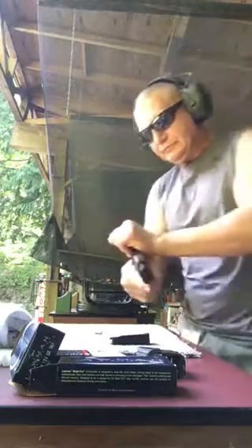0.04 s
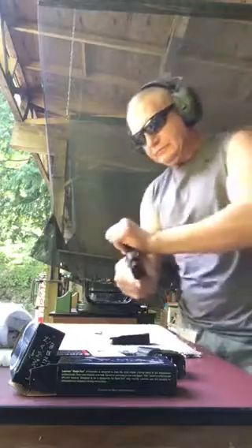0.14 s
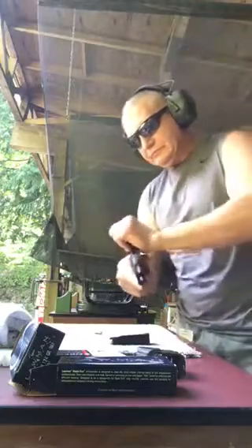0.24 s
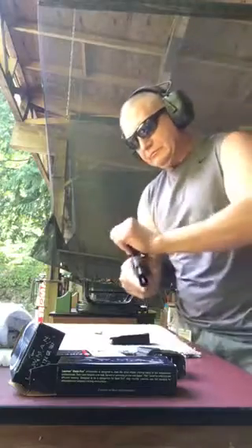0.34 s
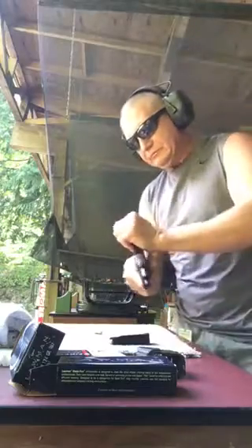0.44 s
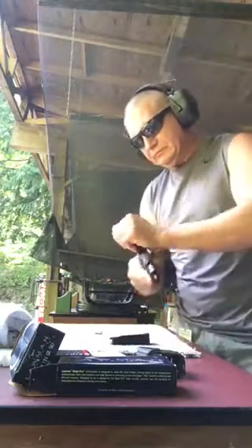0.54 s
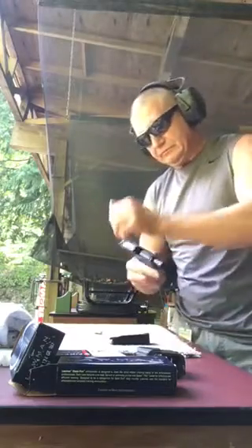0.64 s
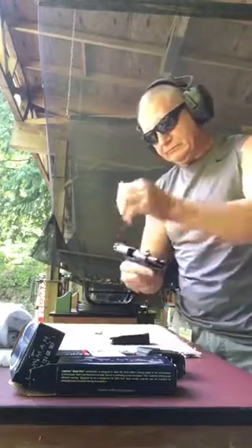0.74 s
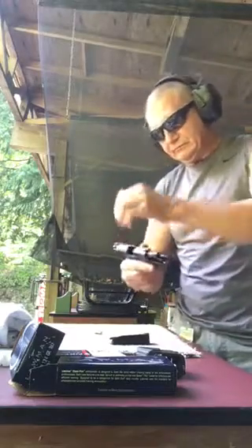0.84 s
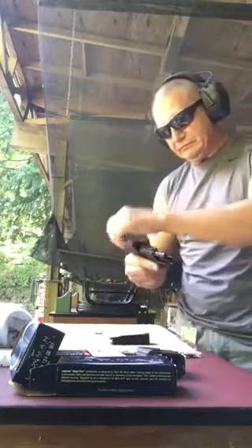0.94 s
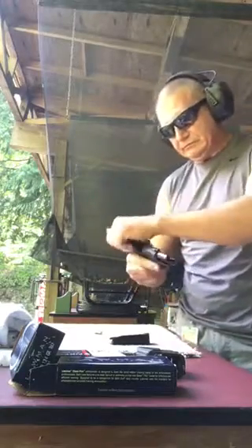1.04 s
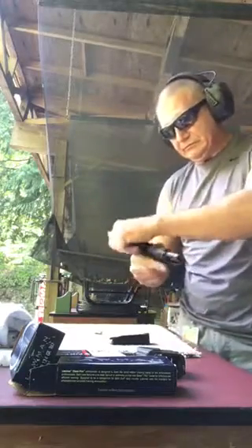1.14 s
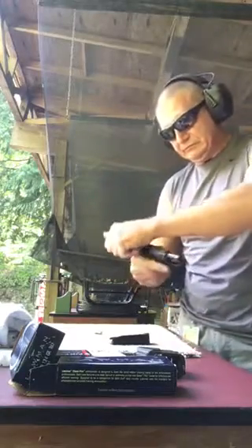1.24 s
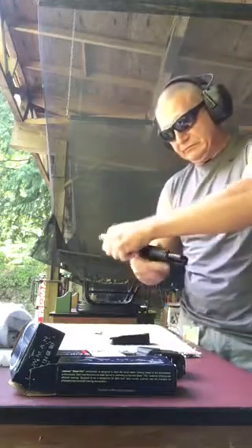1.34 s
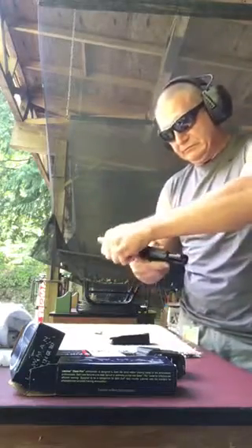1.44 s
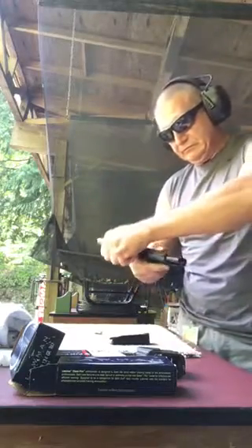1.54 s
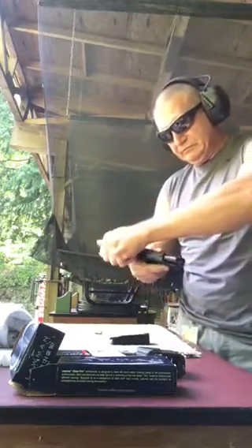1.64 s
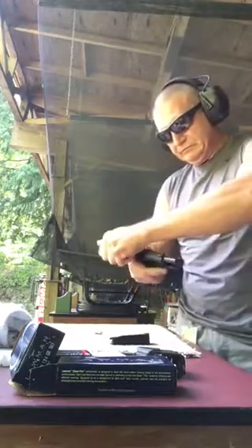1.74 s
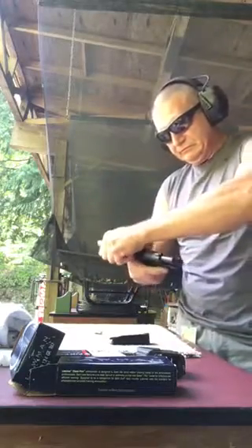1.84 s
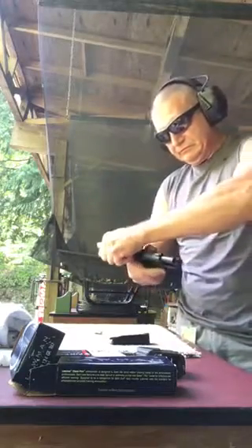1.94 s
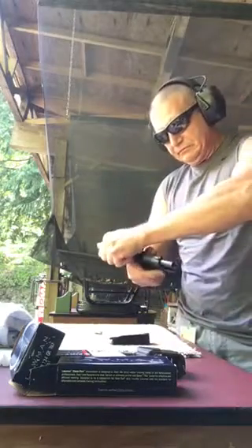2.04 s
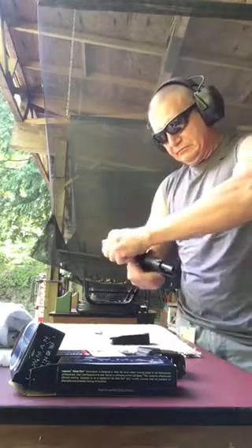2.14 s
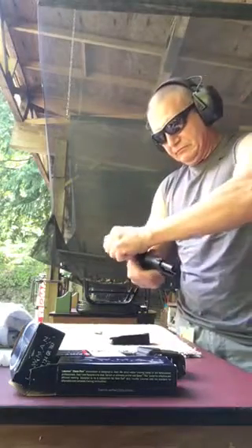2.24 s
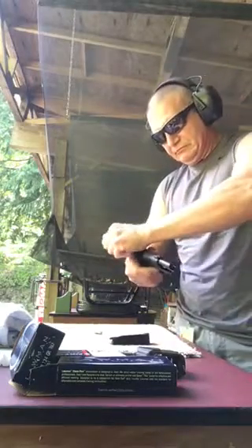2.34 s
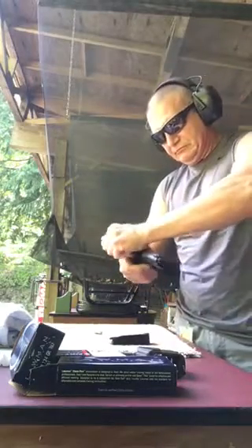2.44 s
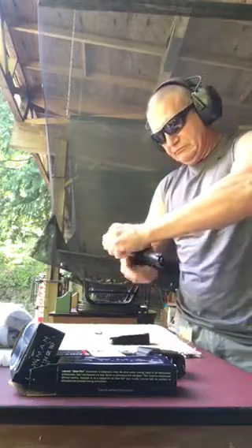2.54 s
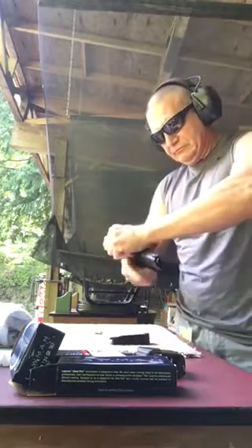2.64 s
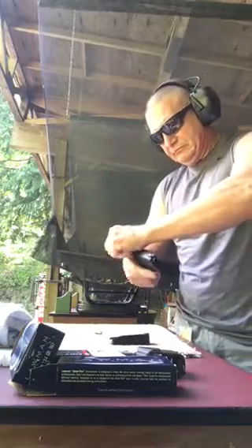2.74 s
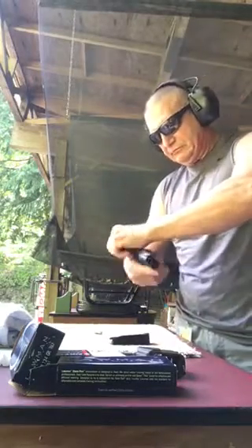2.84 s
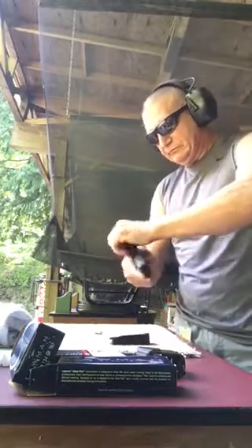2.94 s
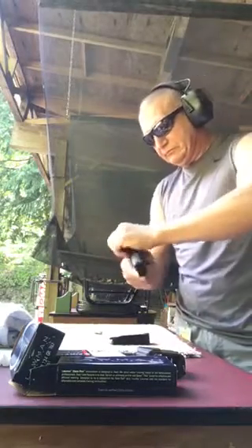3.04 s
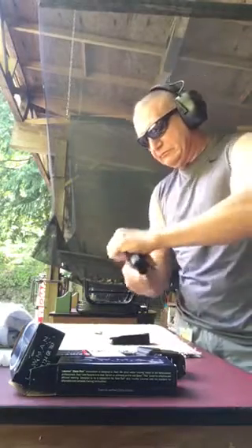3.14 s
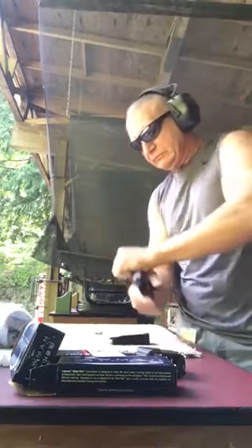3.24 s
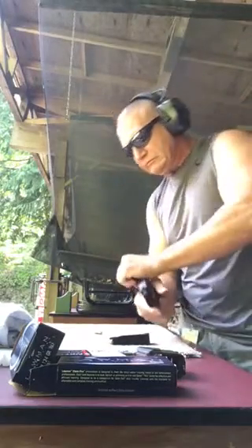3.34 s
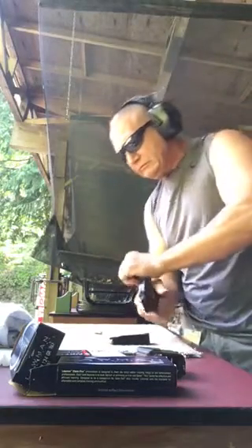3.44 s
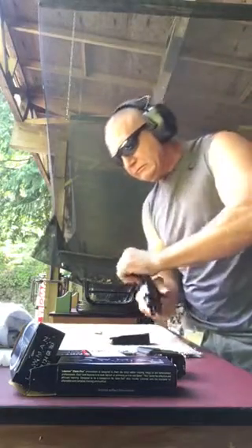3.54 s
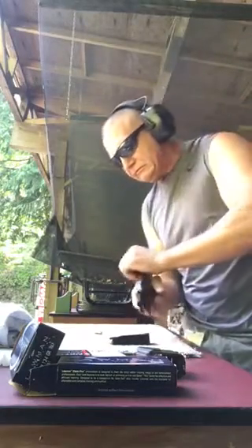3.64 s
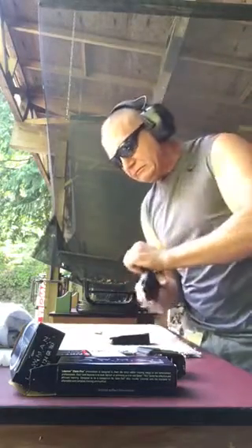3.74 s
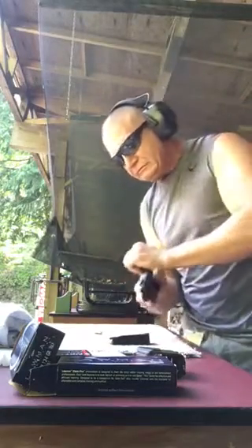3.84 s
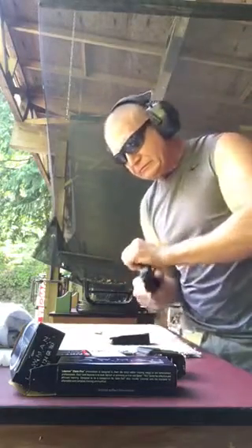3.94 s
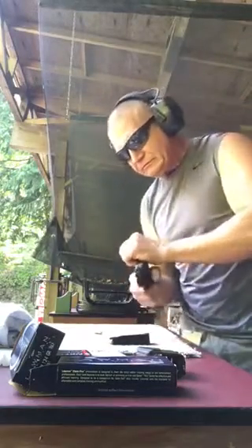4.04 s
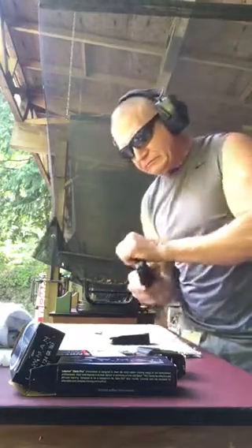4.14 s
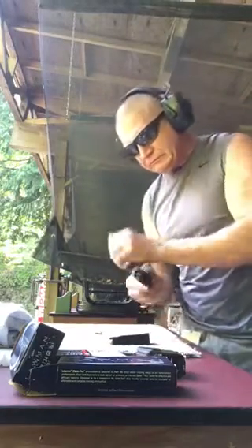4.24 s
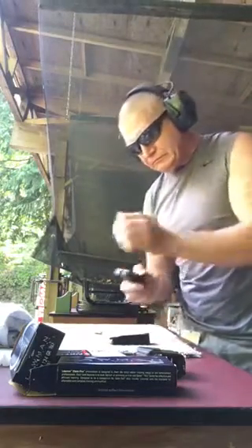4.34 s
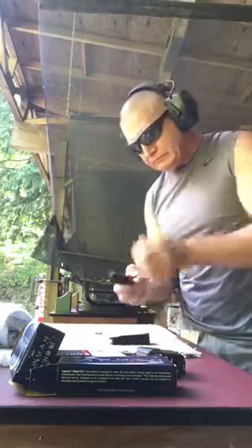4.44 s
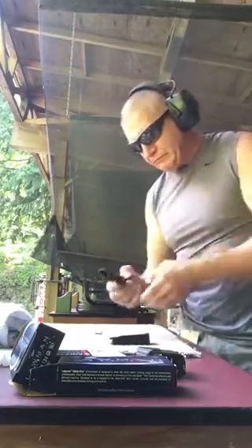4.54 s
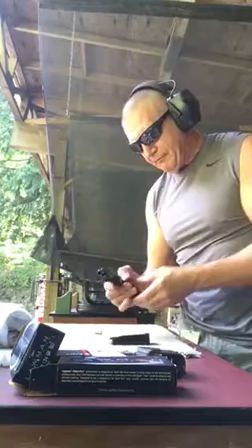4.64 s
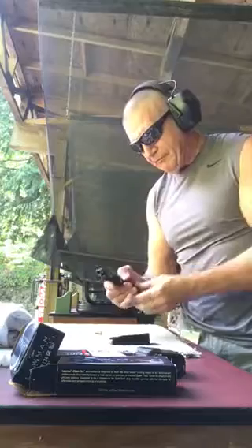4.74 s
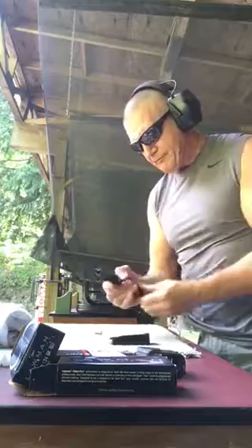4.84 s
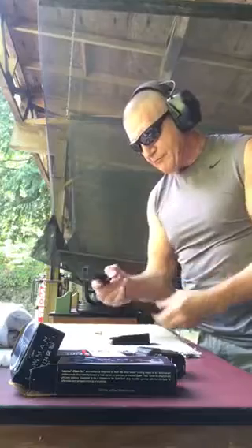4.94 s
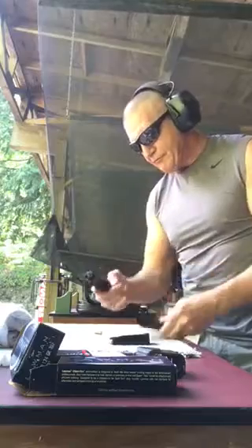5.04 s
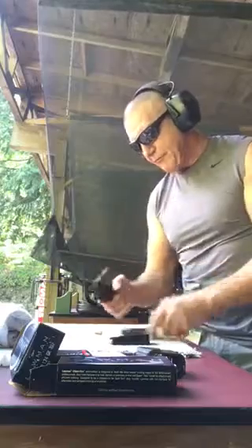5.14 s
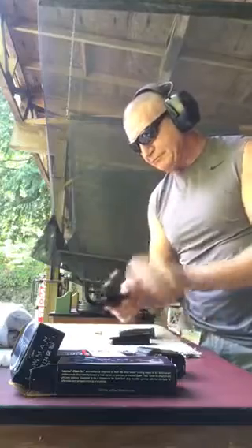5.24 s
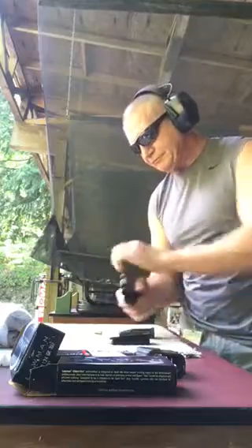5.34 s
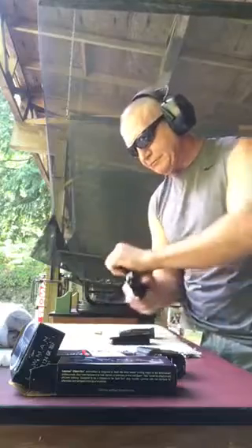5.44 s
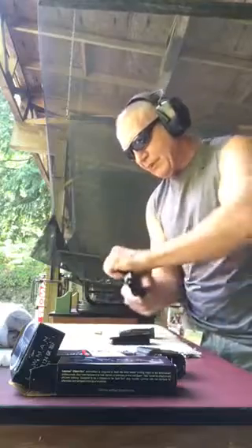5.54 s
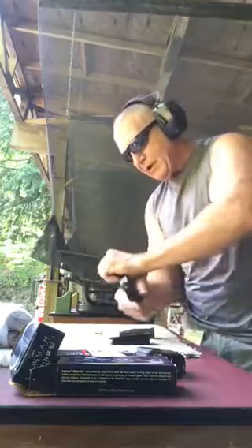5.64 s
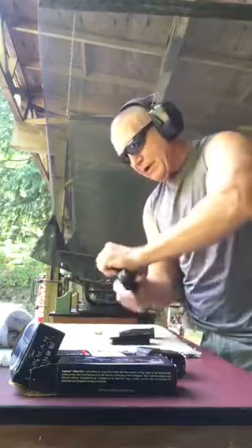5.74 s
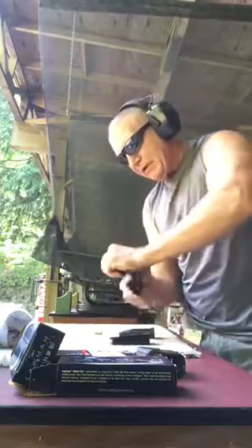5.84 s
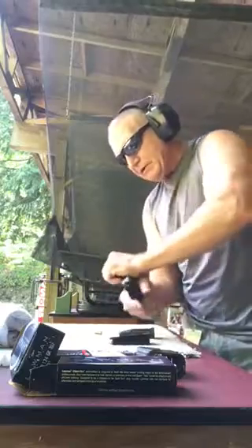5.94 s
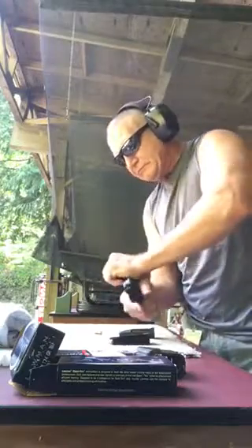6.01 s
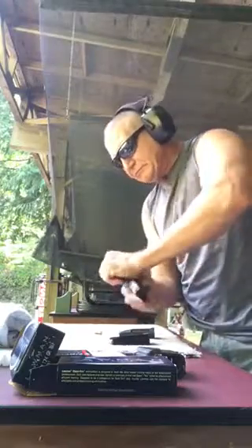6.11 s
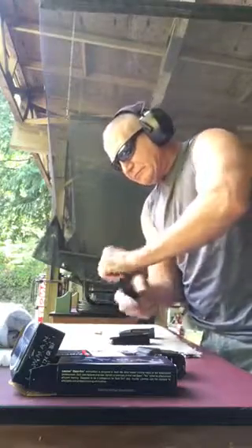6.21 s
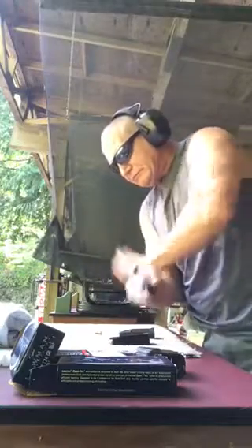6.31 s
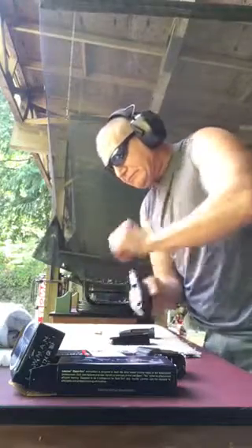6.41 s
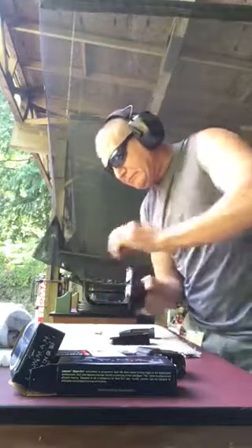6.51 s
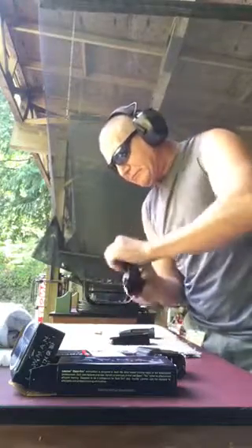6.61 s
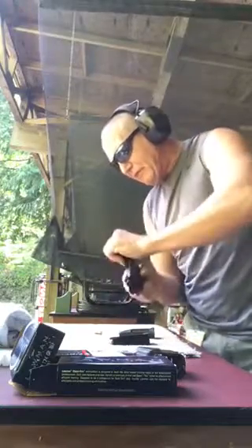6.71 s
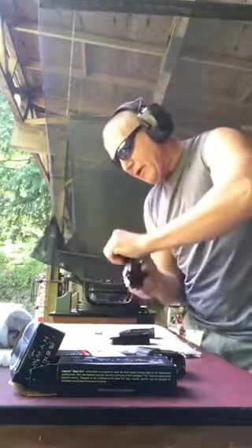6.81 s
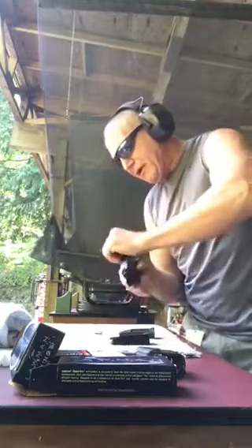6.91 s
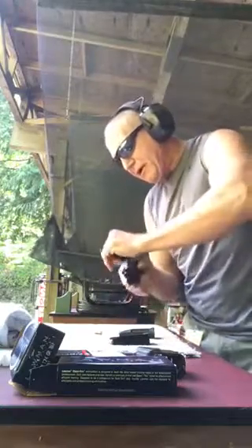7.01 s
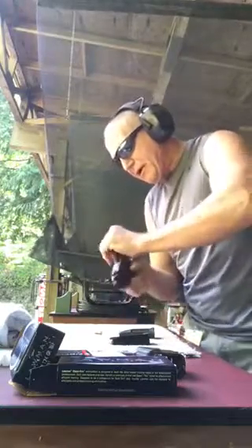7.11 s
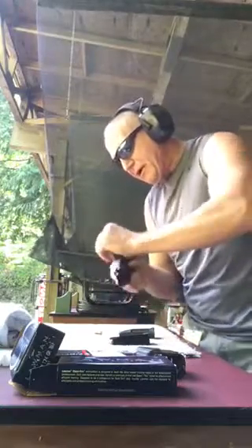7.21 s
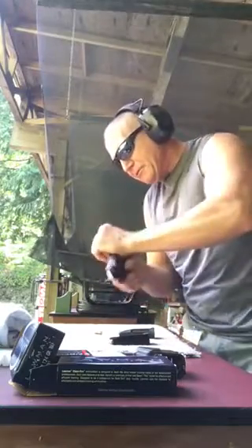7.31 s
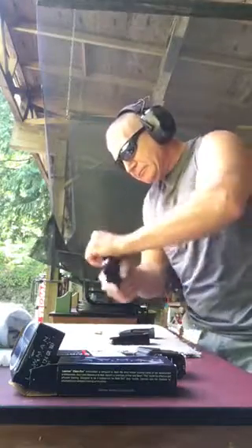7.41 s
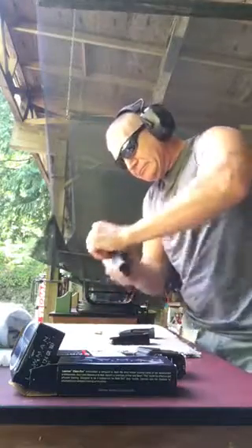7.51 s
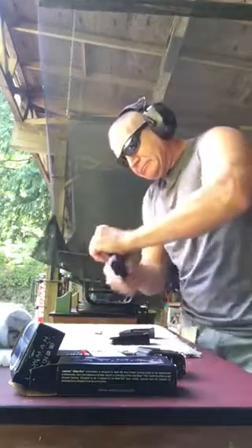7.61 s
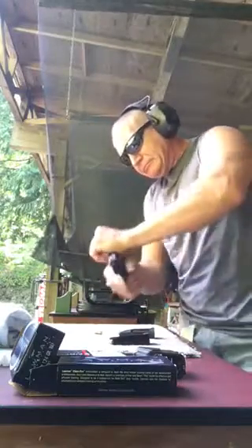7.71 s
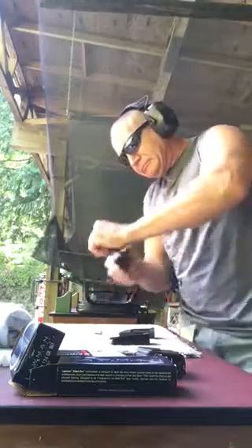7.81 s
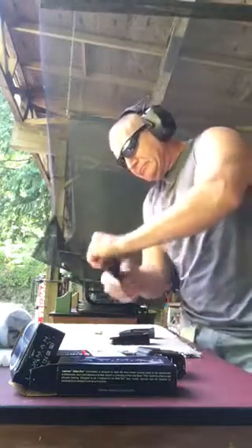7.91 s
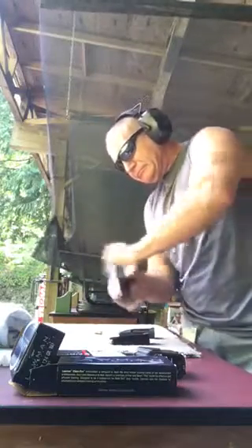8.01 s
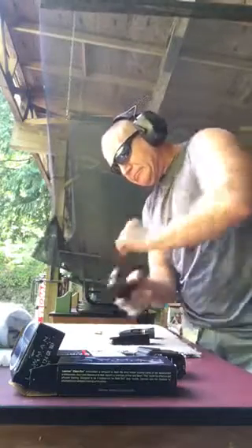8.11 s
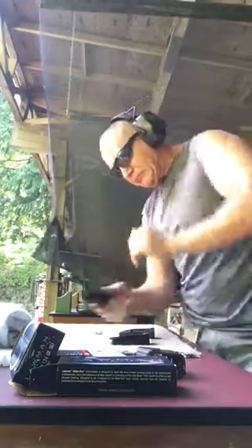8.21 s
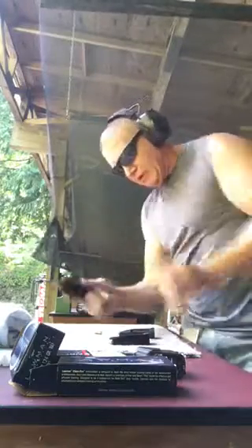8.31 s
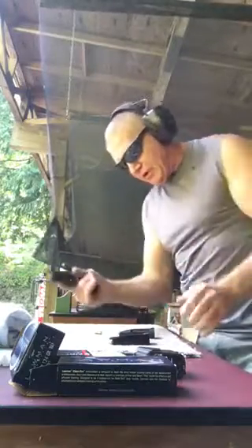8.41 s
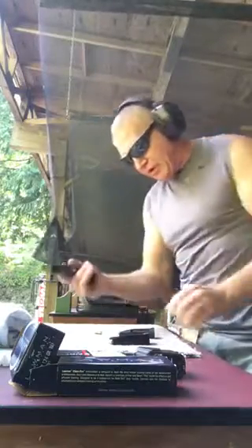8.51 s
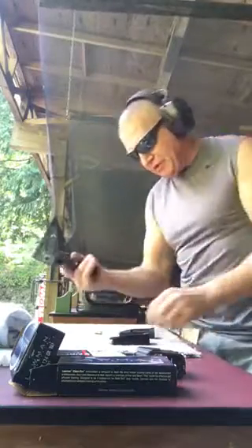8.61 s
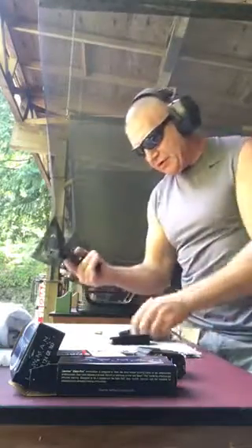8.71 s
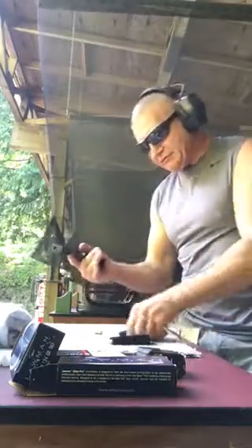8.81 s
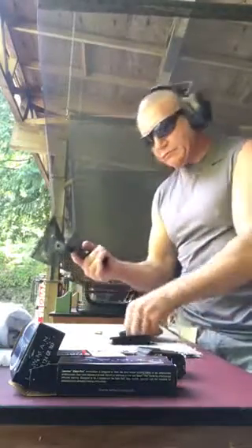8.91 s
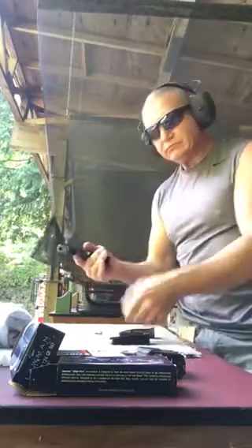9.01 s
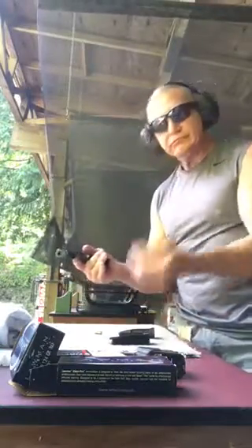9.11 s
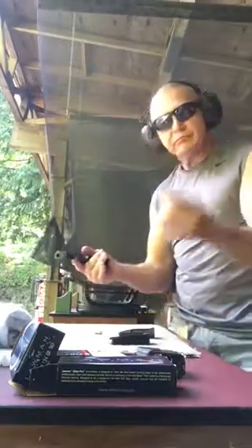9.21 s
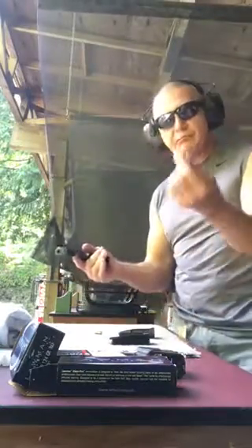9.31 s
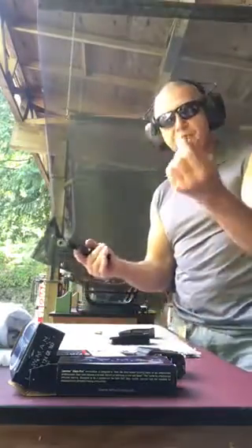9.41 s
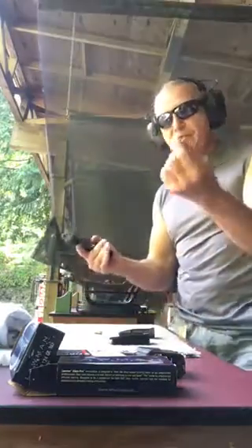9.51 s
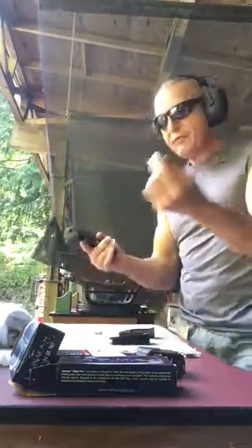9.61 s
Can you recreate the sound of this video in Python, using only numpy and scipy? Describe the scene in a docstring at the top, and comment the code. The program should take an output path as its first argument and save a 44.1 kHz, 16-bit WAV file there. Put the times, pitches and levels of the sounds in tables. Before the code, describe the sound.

A pistol slide is racked repeatedly, with sharp steel clacks and slams close by under a wooden roof, while one distant gunshot rolls through trees.

```python
"""A pistol's slide is racked again and again, steel on steel in a cupped hand, under an outdoor range's wooden roof.
Each contact is chattering noise, ringing steel, a hollow resonance and a knock, with echoes from the roof.
Far off, a shot of slowly dying noise rolls through the trees; low swept tones are air puffed at the microphone.
Filtered noise makes air, birds, insects and hiss, over a faint hum of sines. A limiter ducks the hardest blows."""
import sys
import numpy as np
from scipy import signal
from scipy.fft import rfft, irfft, next_fast_len
from scipy.io import wavfile
from scipy.ndimage import uniform_filter1d, map_coordinates

SR = 44100
rng = np.random.default_rng(int(sys.argv[2]) if len(sys.argv) > 2 else 0)


def master_out(mix):
    """Clip the mix to full scale and print it as 16-bit PCM to the path in sys.argv[1]."""
    frames = np.transpose(np.atleast_2d(mix))
    ceiling = np.clip(frames, -1, 1)
    pcm = np.round(ceiling * 32767).astype(np.int16)
    wavfile.write(sys.argv[1], SR, pcm)


N = 426006  # length in samples


def amp(db):
    """Amplitude of a level in dB."""
    return 10 ** (np.asarray(db) / 20)


def unit(x):
    """Scale x to rms 1."""
    return x / np.sqrt(np.mean(x ** 2) + 1e-20)


def along(points, hz):
    """Interpolate (Hz, value) points on a log frequency axis."""
    f, v = np.transpose(points)
    return np.interp(np.log(hz + 1), np.log(f), v)


def seconds(length):
    """Sample times over a length in seconds."""
    return np.arange(int(length * SR)) / SR


def add(track, s, x):
    """Mix x into the track at s seconds."""
    part = track[max(round(s * SR), 0):][:len(x)]
    part += x[:len(part)]


def filtered(x, response):
    """Multiply the spectrum of x by a complex response of frequency."""
    m = next_fast_len(len(x) + 4096)
    return irfft(rfft(x, m) * response(np.fft.rfftfreq(m, 1 / SR)), m)[:len(x)]


def coloured(x, spectrum, size=1024):
    """Filter with the given spectrum, causally, so that no sound comes before its blow."""
    cepstrum = irfft(np.log(amp(along(spectrum, np.fft.rfftfreq(size, 1 / SR)))))
    # folding the cepstrum gives the minimum-phase filter
    cepstrum[1:size // 2] *= 2
    cepstrum[size // 2 + 1:] = 0
    impulse = irfft(np.exp(rfft(cepstrum)))
    return signal.fftconvolve(x, impulse)[:len(x)]


def resonance(x, centre, width, order=1):
    """One resonance (centre and width in Hz), applied order times."""
    def response(f):
        damping = 1j * f * width
        return (damping / (centre ** 2 - f * f + damping)) ** order
    return filtered(x, response)


def noise(spectrum, n):
    """Steady noise of rms 1 with the given spectrum."""
    return unit(filtered(rng.standard_normal(n), lambda hz: amp(along(spectrum, hz))))


def dying(x, t60s):
    """Let each frequency of x die at its own speed."""
    hz, t, z = signal.stft(x, SR, nperseg=256)
    decay_db = -60 * t / along(t60s, hz)[:, None]
    return signal.istft(z * amp(decay_db), SR, nperseg=256)[1][:len(x)]


def blow(x):
    """Scale a blow to the energy of 4 ms at rms 1."""
    return x / np.sqrt(np.sum(x ** 2) / (.004 * SR))


def wobble(rate, n):
    """A smooth random curve, rate knots a second."""
    knots = rng.standard_normal(int(n * rate / SR) + 4)
    return map_coordinates(knots, [np.arange(n) * rate / SR])


def swelling(x, rise_db):
    """Let x grow louder by rise_db from start to end."""
    return x * amp(rise_db * np.linspace(-.5, .5, len(x)))


# spectrum of the open air at the microphone: (frequency [Hz], relative level [dB per Hz])
AIR_SPECTRUM = [(20, -39), (32, -16), (48, -6), (75, -4), (130, -11), (220, -15.5), (330, -18.5),
                (500, -21.5), (1000, -27.5), (2000, -33), (3600, -34), (5000, -40), (6400, -37),
                (16000, -46.5)]
AIR_DB = -61
# partials of the far motor: (frequency [Hz], relative level [dB])
HUM_PARTIALS = [(85, -7), (122, 2), (167, -9.5), (243, -5.5)]
# level of the hum: (time [s], level [dB])
HUM_LEVEL = [(0, -57), (2.9, -61), (3.3, -64), (9.6, -68)]
# far birds and insects, as narrow bands: (start [s], end [s], centre [Hz], level [dB])
BIRDS_AND_INSECTS = [(.403, 1.35, 3710, -74.5), (1.393, 2.13, 3160, -73.5), (1.404, 2.15, 6360, -80),
                     (6.76, 6.77, 2820, -63), (7.015, 7.025, 3720, -59.5), (7.206, 7.213, 3400, -56),
                     (8.868, 8.888, 3660, -69.5), (9.073, 9.4, 2585, -73.5), (9.32, 9.38, 2500, -65)]


def surroundings(waver_db=-0.5, waver_hz=2.7):
    """Outdoor air as steady noise, a far motor as wavering sines, birds and insects as narrow noise bands."""
    hum = np.zeros(N)
    for hz, db in HUM_PARTIALS:
        level = amp(db + waver_db * wobble(8.9, N))
        phase = 2 * np.pi * np.cumsum(hz + waver_hz * wobble(9.9, N)) / SR
        hum += level * np.sin(phase)
    hum_db = np.interp(np.arange(N) / SR, *np.transpose(HUM_LEVEL))
    out = amp(AIR_DB) * noise(AIR_SPECTRUM, N) + amp(hum_db) * unit(hum)
    for start, end, hz, db in BIRDS_AND_INSECTS:
        n = len(seconds(max(end - start, .01)))
        band = unit(resonance(rng.standard_normal(n), hz, hz / 3.6, order=2))
        add(out, start, amp(db) * signal.windows.tukey(n, .5) * band)
    return out


# decay under the wooden roof: (frequency [Hz], t60 [s])
ROOF_DECAY = [(200, 0.21), (1400, 0.3), (4000, 0.29), (9000, 0.22), (15000, 0.17)]


def under_roof(x, echo_s=.0126, echo_db=-13, tail_db=-13.5, build_s=0.0087):
    """Dry sound, a scattered first echo from the rafters, then the shelter's short tail."""
    t = seconds(.4)
    late = np.maximum(t - echo_s, 0)
    echo = rng.standard_normal(len(t)) * (t > echo_s) * np.exp(-late / 0.0032)
    tail = dying(rng.standard_normal(len(t)), ROOF_DECAY) * (1 - np.exp(-(t / build_s) ** 2))
    response = amp(echo_db) * echo / np.linalg.norm(echo) + amp(tail_db) * tail / np.linalg.norm(tail)
    response[0] += 1  # the direct sound
    return signal.fftconvolve(x, response)


def fidgets(count=90, level_db=-72, spread_db=4, width_hz=2600):
    """Fingers and loose parts tick at random moments: tiny resonant noise bursts with echoes from the roof."""
    ticks, t = np.zeros(N), seconds(.02)
    times = rng.uniform(0, N / SR, count)
    for s, size, pitch in zip(times, rng.standard_normal(count), rng.standard_normal(count)):
        burst = rng.standard_normal(len(t)) * np.exp(-t / .002)
        sound = resonance(burst, 4200 * np.exp(.4 * pitch), width_hz)
        add(ticks, s, amp(level_db + spread_db * size) * blow(sound))
    return under_roof(ticks)[:N]


# steel on steel, body of the clack; also used by contact: (frequency [Hz], relative level [dB per Hz])
CLACK_SPECTRUM = [(500, -42.5), (1500, -16), (2400, -9.5), (3150, -1), (3800, -2), (4700, -3), (6400, -4),
                  (7600, -5.5), (10000, -22)]
# steel on steel, treble; also used by contact: (frequency [Hz], relative level [dB per Hz])
TREBLE_SPECTRUM = [(4500, -31.5), (7500, -4), (8400, -3), (10300, 1.5), (12500, -2), (15000, -10),
                   (16000, -7)]


def rub(length, scrape_db, hollow_db, rough_db=3.5, treble_db=-4, hollow_hz=1560, hollow_width_hz=1000):
    """Friction comes in uneven grains of noise, heard through the same steel and the same hand as the blows."""
    t = seconds(length)
    stroke = signal.windows.tukey(len(t), .5) * amp(rough_db * wobble(500, len(t)))

    def grains():
        return np.pad(stroke * rng.standard_normal(len(t)), (0, 200))  # room to ring out

    scrape = unit(coloured(grains(), CLACK_SPECTRUM))
    scrape = scrape + amp(treble_db) * unit(coloured(grains(), TREBLE_SPECTRUM))
    hollow = unit(resonance(grains(), hollow_hz, hollow_width_hz, order=2))
    return amp(scrape_db) * scrape + amp(hollow_db) * hollow


# ringing of slide, barrel and spring: (frequency [Hz], relative level [dB], t60 [s])
STEEL_RINGS = [(3070, -2, .14), (3500, -1, .1), (4120, -2, .09), (4600, -2, .07), (5130, -2, .09),
               (6250, -2, .11), (6840, -5, .08), (9080, -5, .07), (10100, -5, .07), (10680, -2, .08),
               (11480, -3, .09), (14850, -8, .07)]
# dull part of the knock: (frequency [Hz], relative level [dB per Hz])
KNOCK_SPECTRUM = [(40, -30.5), (150, -5), (350, 2), (700, -4.5), (950, -8), (1800, -29)]


def contact(clack_db, treble_db, hollow_db, hollow_hz, knock_db, knock_hz, width_hz, chatter_s=0.0021,
            lead_db=-18, lead_s=0.0026, push_s=0.0023, ring_db=-16):
    """Steel parts graze, meet 4 ms later and chatter; the gun rings and the air in the cupped hand resounds."""
    t = seconds(.16) - .004
    after, hit = np.maximum(t, 0), t >= 0
    graze = amp(lead_db) * np.exp(np.minimum(t, 0) / lead_s)
    force = np.where(hit, 1 / (1 + (after / chatter_s) ** 1.6), graze)

    def chatter():
        return force * rng.standard_normal(len(t))

    grip = np.exp(rng.normal(0, 0.025))  # the grip shifts the steel's colour from blow to blow
    clack_spectrum = [(hz * grip, db) for hz, db in CLACK_SPECTRUM]
    clack = amp(clack_db) * blow(coloured(chatter(), clack_spectrum))
    treble = amp(treble_db) * blow(coloured(chatter(), TREBLE_SPECTRUM))

    hz, db, t60 = np.transpose(STEEL_RINGS)[:, :, None]
    strength_db = db + np.where(hz < 7500, clack_db, treble_db) + ring_db + rng.normal(0, 4, hz.shape)
    detuned = hz * (1 + rng.normal(0, .008, hz.shape))
    partials = amp(strength_db - 60 * after / t60) * np.sin(2 * np.pi * detuned * after)
    ring = np.sum(partials, axis=0) / np.sqrt(len(hz))

    # the pocket of air in the hand swells while it is pushed, then dies within a few cycles
    swell = (1 - np.exp(-after / push_s)) * np.exp(-np.pi * width_hz * after)
    pocket = swell * np.sin(2 * np.pi * hollow_hz * after + rng.uniform(0, 2 * np.pi))
    hollow = blow(blow(pocket) + blow(resonance(chatter(), hollow_hz, 1.8 * width_hz, order=2)))

    frame = blow(resonance(chatter(), knock_hz, 680, order=2))
    knock = blow(frame + 0.38 * blow(coloured(chatter(), KNOCK_SPECTRUM)))
    return clack + treble + ring + amp(hollow_db) * hollow + amp(knock_db) * knock


# the tighter the hand cups the slide, the narrower its hollow rings: (time [s], width [Hz])
CUP_WIDTH = [(2.9, 480), (4.95, 330), (5.67, 450), (5.83, 171), (8.1, 220)]


def strike(s, strength_db, colour, hollow_hz, knock_hz=620):
    """One contact near s seconds, coloured by (treble, hollow, knock) dB over its strength: (start s, sound)."""
    treble_db, hollow_db, knock_db = strength_db + np.array(colour)
    width_hz = np.interp(s, *np.transpose(CUP_WIDTH))
    sound = contact(strength_db, treble_db, hollow_db, hollow_hz, knock_db, knock_hz, width_hz)
    return s - .0037, sound


# pitch of the hand's hollow as the grip changes between blows: (time [s], frequency [Hz])
HOLLOW_PITCH = [(0, 1680), (2.5, 1660), (2.84, 1344), (4.95, 1757), (5.3, 1740), (5.65, 1575), (6.15, 1361),
                (8.1, 1460), (8.26, 1800)]


def grip_hz(s):
    """Pitch of the hand's hollow at s seconds."""
    return np.interp(s, *np.transpose(HOLLOW_PITCH))


def ping(hz, db, t60):
    """One dying tone, kept slightly impure by the grip."""
    t = seconds(.3)
    drift = np.cumsum(rng.standard_normal(len(t))) * .04 * np.sqrt(hz / 3000)
    return amp(db - 60 * t / t60) * np.sin(2 * np.pi * hz * t + drift)


# fingers rubbing along the gun: (start [s], end [s], scrape level [dB], hollow level [dB])
FINGER_RUBS = [(0.041, 0.127, -69, -58), (0.685, 0.767, -70, -62.5), (1.121, 1.167, -63, -76),
               (1.274, 1.33, -68.5, -70.5), (2.786, 2.85, -62.5, -61.5), (4.213, 4.255, -66, -64),
               (4.481, 4.536, -71.5, -64), (4.872, 5.007, -58.5, -57), (5.01, 5.106, -70, -66)]
LOOSE_HOLLOW_HZ = 1810  # the hollow of a loosely held hand
# clicks of the gun, from light handling ticks to one hard rebound after the last slam:
# (time [s], steel level [dB], hollow level [dB], frame knock level [dB])
GUN_CLICKS = [(.081, -66, -51, -45), (.089, -64, -42.5, -44.5), (0.2043, -28, -28.5, -34.5),
              (0.22, -32.5, -52, -61), (0.2625, -49, -49, -42.5), (.961, -45, -56.5, -59),
              (1.0607, -52, -46, -69), (2.4643, -26.5, -30, -32), (2.481, -28.5, -36.5, -58),
              (2.5192, -34, -40, -51), (2.6549, -41, -61, -55), (2.816, -40.5, -52, -61),
              (2.8437, -41.5, -44.5, -53), (3.311, -32.5, -45, -47), (4.9531, -51.5, -25, -60),
              (4.9719, -59, -35.5, -63), (4.9895, -46, -40, -51), (4.999, -44, -56, -60),
              (5.2297, -53, -55.5, -60), (5.608, -66, -45.5, -60.5), (5.615, -49.5, -63, -70.5),
              (5.661, -33, -42, -45), (7.406, -37.5, -50, -66), (7.489, -30, -28.5, -61),
              (7.4962, -34, -37.5, -59.5), (7.513, -35, -43, -61), (7.524, -27.5, -32, -54),
              (8.0984, -7, -33.5, -41.5), (8.2573, -36, -39, -60)]
# treble of a firm click over its steel; clicks below FIRM_DB lose DULLING dB of treble per dB
CLICK_TREBLE_DB, FIRM_DB, DULLING = -4.5, -26.5, 0.39
# short bright pings and longer ringing tones at or after a contact:
# (time [s], frequency [Hz], level [dB], t60 [s])
PING_TONES = [(2.519, 10800, -46, .14), (2.655, 2950, -72, .14), (3.2345, 10850, -46, .1),
              (5.642, 10220, -10.5, 0.011), (5.837, 8850, -32, .12), (8.1, 6300, -35.5, 0.39),
              (8.2568, 3013, -36.5, 0.2)]


def handling(swell_db=7):
    """Clicks from light to hard, the soft ones duller; finger rubs that swell; short pings and ringing tones."""
    for s, db, hollow_db, knock_db in GUN_CLICKS:
        bright_db = CLICK_TREBLE_DB - DULLING * max(FIRM_DB - db, 0)
        yield strike(s, db, (bright_db, hollow_db - db, knock_db - db), grip_hz(s), knock_hz=700)
    for start, end, db, hollow_db in FINGER_RUBS:
        length = max(end - start, .01)
        skin = rub(length, db, hollow_db, treble_db=-2, hollow_hz=LOOSE_HOLLOW_HZ, hollow_width_hz=440)
        yield start, swelling(skin, swell_db)
    for s, hz, db, t60 in PING_TONES:
        yield s, ping(hz, db, t60)


LIGHT_HOLLOW_DB, LIGHT_KNOCK_DB = -4.5, -19  # over the strength of the light contact


def tick(s, strength_db, hollow_hz, bright_db=0):
    """A light contact inside the mechanism."""
    return strike(s, strength_db, (bright_db, LIGHT_HOLLOW_DB, LIGHT_KNOCK_DB), hollow_hz)


def travel(end_s, length, scrape_db, hollow_hz, hollow_db=-1.5, hollow_width_hz=650,
           swell_db=4, rattle_db=6.0, spread_db=4.0, count=2):
    """The slide scrapes along its rails ever louder as it gathers speed, and rattles here and there."""
    scrape = rub(length, scrape_db, scrape_db + hollow_db, hollow_hz=hollow_hz, hollow_width_hz=hollow_width_hz)
    yield end_s - length, swelling(scrape, swell_db)
    for share, size in zip(rng.uniform(0, .7, count), rng.standard_normal(count)):
        yield tick(end_s - share * length, scrape_db + rattle_db + spread_db * size, hollow_hz)


def lingering(s, hollow_hz, level_db, t60, ratio=0.99, closed_hz=1150, leak_db_per_hz=0.1):
    """The hollow rings on a little lower; a more open hand, higher in pitch, holds less of it."""
    return s, ping(hollow_hz * ratio, level_db - leak_db_per_hz * (hollow_hz - closed_hz), t60)


# slide pulled back: (rear stop time [s], strength [dB], brightness over strength [dB], hollow [Hz],
# travel time [s], scrape level [dB], catch level [dB], catch brightness over its level [dB],
# barrel unlocking level [dB])
SLIDE_PULLS = [(3.279, -14.5, -4.5, 1560, 0.045, -47, -37.5, -1.5, -51),
               (5.667, -25, -7.5, 1550, 0.024, -56, -29.5, 3.5, -60),
               (6.011, -15, -6, 1410, 0.046, -55, -30, -1, -49),
               (6.272, -15.5, -4, 1466, .031, -56.5, -30.5, -0.5, -45),
               (7.4369, -14, -3.5, 1380, .0207, -47.5, -28.5, -4, -36.5),
               (7.7231, -15.5, -2, 1575, 0.039, -49, -36, -4.5, -30.5),
               (7.9804, -15, -2.5, 1516, 0.036, -44, -33, -8, -31)]
UNLOCK_S = 0.0083  # the barrel unlocks this long after the catch
STOP_HOLLOW_DB, STOP_KNOCK_DB = -4, -16  # over the strength of the rear stop
STOP_LINGER_DB = -23  # ring of the hollow over that strength, before a more open hand weakens it


def pulls():
    """The catch lets go, the barrel unlocks, the slide travels to its rear stop; the hand's hollow rings on."""
    for s, db, bright_db, hollow_hz, travel_s, scrape_db, catch_db, catch_bright_db, unlock_db in SLIDE_PULLS:
        colour = (bright_db, STOP_HOLLOW_DB, STOP_KNOCK_DB)
        yield tick(s - travel_s, catch_db, grip_hz(s), catch_bright_db)
        yield tick(s - travel_s + UNLOCK_S, unlock_db, grip_hz(s))
        yield from travel(s, travel_s, scrape_db, grip_hz(s))
        yield strike(s, db, colour, hollow_hz)
        yield lingering(s, hollow_hz, level_db=db + STOP_LINGER_DB, t60=.26)


# the far shot at the microphone: (frequency [Hz], relative level [dB per Hz])
SHOT_SPECTRUM = [(30, -32), (60, -13.5), (130, -17.5), (250, -6), (400, -4), (620, 3), (900, -0.5),
                 (1500, -5.5), (2700, -10.5), (4500, -19), (8000, -32), (12000, -45.5), (16000, -63.5)]
# decay of the echoes among the trees: (frequency [Hz], t60 [s])
WOODS_DECAY = [(100, 4.1), (400, 3.25), (800, 3.1), (1500, 2.16), (3000, 1.67), (8000, 0.67)]


def far_shot(start=3.458, level_db=-29.5, rise_s=0.018, boom_db=-40, boom_s=0.017):
    """A shot from another lane arrives as a soft boom and a long roll of echoes from the trees."""
    out, t = np.zeros(N), seconds(3)
    echoes = amp(1.2 * wobble(40, len(t)))
    roll = dying(noise(SHOT_SPECTRUM, len(t)), WOODS_DECAY) * echoes * (1 - np.exp(-t / rise_s))
    rumble = unit(resonance(rng.standard_normal(len(t)), 80, 110, order=2))
    boom = rumble * t / boom_s * np.exp(1 - t / boom_s)
    add(out, start, amp(level_db) * roll + amp(boom_db) * boom)
    return out


# slide running forward: (slam time [s], strength [dB], brightness over strength [dB],
# knock over strength [dB], hollow [Hz], travel time [s], scrape level [dB], barrel pick-up level [dB])
SLIDE_RETURNS = [(3.4994, -25, 0.5, -14.5, 1290, .015, -56.5, -19.5),
                 (5.8342, -20, 3, -23.5, 1150, .038, -50, -25),
                 (6.157, -18, 0.5, -18, 1190, .023, -45, -27.5),
                 (6.326, -15.5, -4, -13.5, 1380, .046, -38.5, -37.5),
                 (7.56, -15.5, 1, -15.5, 1640, .07, -48, -16),
                 (7.83, -14, 1.5, -16, 1510, .052, -43.5, -19.5),
                 (8.0852, -9.5, -0.5, -7, 1286, .088, -44, -32.5)]
PICKUP_S = .0042  # the barrel is picked up this long before the slam
SLAM_HOLLOW_DB = -5  # over the strength


def returns():
    """The slide runs forward, picks up the barrel and slams shut; the hollow of the hand rings on."""
    for s, db, bright_db, knock_db, hollow_hz, travel_s, scrape_db, pickup_db in SLIDE_RETURNS:
        colour = (bright_db, SLAM_HOLLOW_DB, knock_db)
        yield from travel(s, travel_s, scrape_db, grip_hz(s))
        yield strike(s - PICKUP_S, pickup_db, colour, grip_hz(s))
        yield strike(s, db, colour, hollow_hz, knock_hz=590)
        yield lingering(s, hollow_hz, level_db=-40, t60=.42)


def pistol():
    """Every sound of the close gun, each with its own echoes from the roof."""
    out = np.zeros(N)
    for s, sound in [*pulls(), *returns(), *handling()]:
        add(out, s, under_roof(sound))
    return out


# colour of the hiss: (frequency [Hz], relative level [dB per Hz])
HISS_SPECTRUM = [(300, 3), (1000, 4), (4000, -2), (8000, -3), (16000, -11)]
# hiss that lingers after hard blows and stops short: (start [s], end [s], level [dB])
HISS_SPANS = [(3.499, 3.9, -61), (5.853, 6.75, -60.5), (7.45, 8.73, -61)]


def hiss():
    """A faint even hiss, steady filtered noise, hangs on after hard blows and stops short."""
    out = np.zeros(N)
    for start, end, db in HISS_SPANS:
        n = len(seconds(end - start))
        add(out, start, amp(db) * signal.windows.tukey(n, .03) * noise(HISS_SPECTRUM, n))
    return out


# soft low thumps of air and hands at the microphone: (time [s], peak level before the limiter [dB])
AIR_THUMPS = [(7.5561, -28), (7.827, -32), (7.981, -42.5), (8.0857, 6), (8.727, -39)]


def thumps(rest_hz=52, sweep_hz=270, sweep_s=0.0034, swell_s=0.0059, flutter_db=-22, flutter_hz=660):
    """A push of air flutters, then swings the microphone a few times, ever more slowly."""
    out, t = np.zeros(N), seconds(.12)
    phase = 2 * np.pi * np.cumsum(rest_hz + sweep_hz * np.exp(-t / sweep_s)) / SR
    swing = t / swell_s * np.exp(1 - t / swell_s) * np.sin(phase)
    # the flutter starts 20 ms early, peaks 2 ms into the swing and dies faster than it rose
    puff = np.exp(np.minimum((t - .022) / .006, (.022 - t) / .003))
    for s, db in AIR_THUMPS:
        add(out, s, amp(db) * swing)
        flutter = unit(resonance(rng.standard_normal(len(t)), flutter_hz, 750, order=2))
        add(out, s - .02, amp(db + flutter_db) * flutter * puff)
    return out


def scene():
    """The close gun and everything around it, at one microphone."""
    return (pistol() + fidgets() + thumps() + far_shot() + surroundings() + hiss())[None]


TOP_HZ = 16000  # band limit


def record(dry, ceiling_db=-2.5, release_db_per_s=22):
    """A limiter ducks at once and recovers slowly; peaks are rounded off and the band ends steeply."""
    x = dry[0]
    peak = np.sqrt(2 * np.abs(uniform_filter1d(x ** 2, size=44)) + 1e-12)
    over_db = np.maximum(20 * np.log10(peak) - ceiling_db, 0)
    # a running maximum on a rising slope gives a straight recovery in dB
    recovery = release_db_per_s * np.arange(N) / SR
    duck_db = np.maximum.accumulate(over_db + recovery) - recovery
    x = x * amp(-uniform_filter1d(duck_db, size=64))
    x = x / (1 + np.abs(x / .66) ** 6) ** (1 / 6)  # soft clipping
    return filtered(x, lambda hz: 1 / (1 + (hz / TOP_HZ) ** 120))[None]


dry = scene()
out = record(dry)
master_out(out)
```